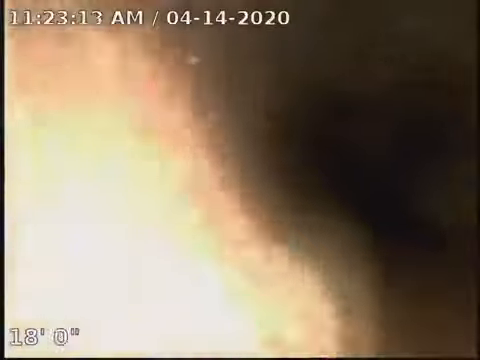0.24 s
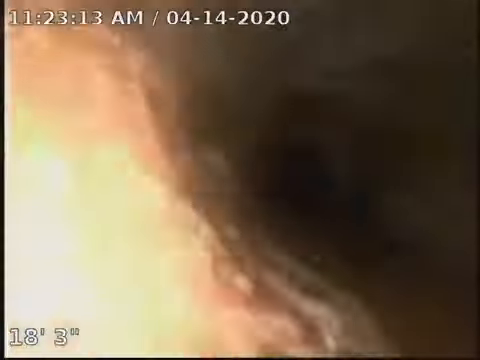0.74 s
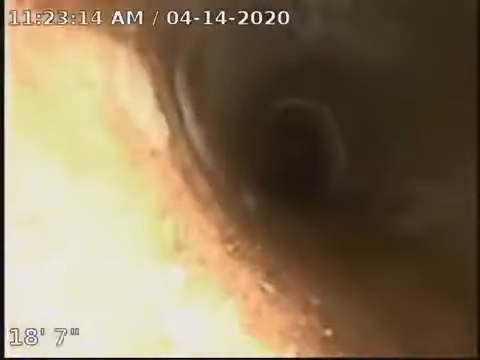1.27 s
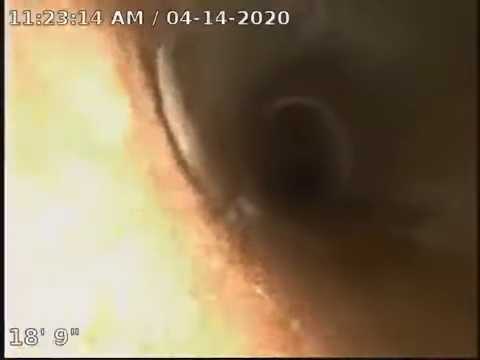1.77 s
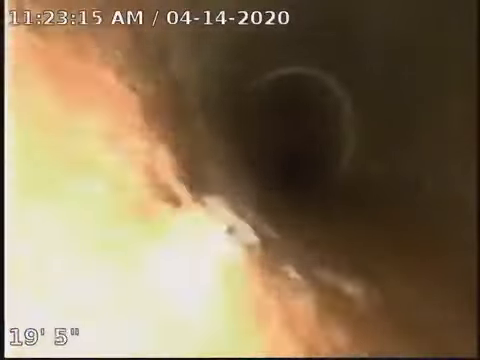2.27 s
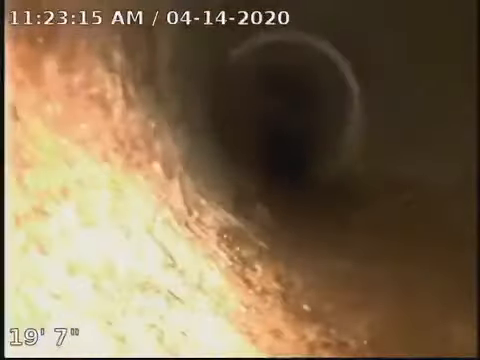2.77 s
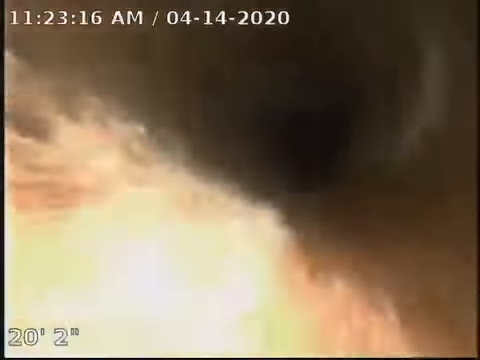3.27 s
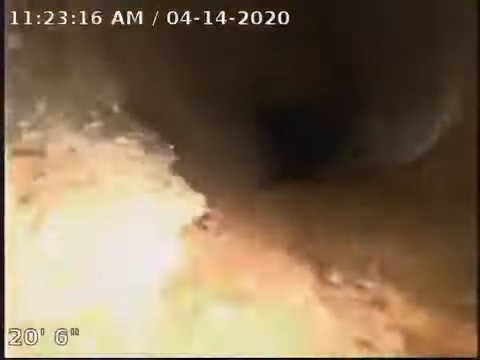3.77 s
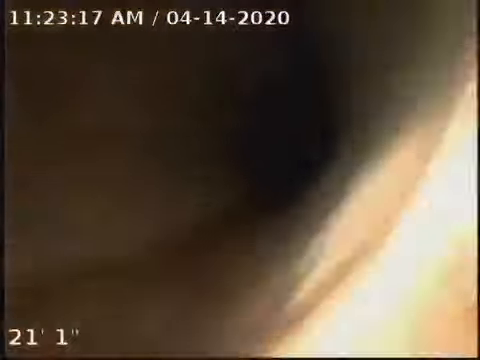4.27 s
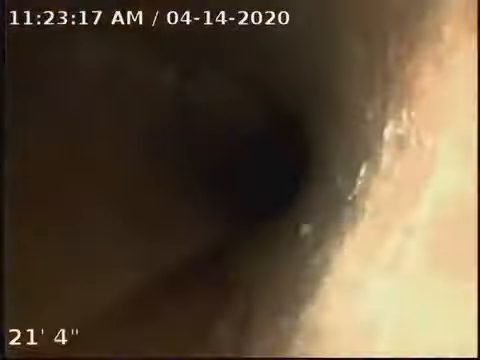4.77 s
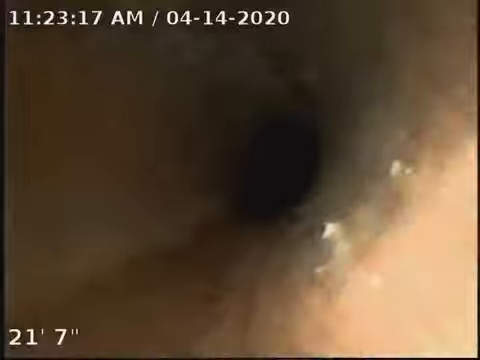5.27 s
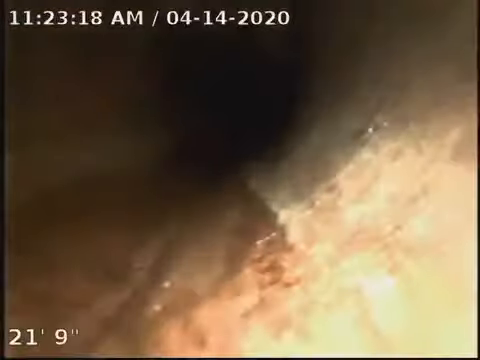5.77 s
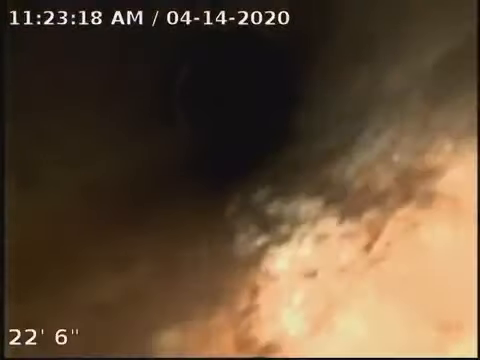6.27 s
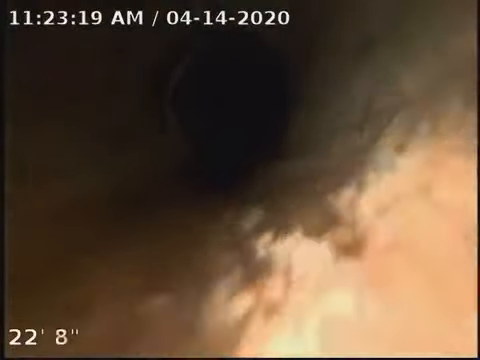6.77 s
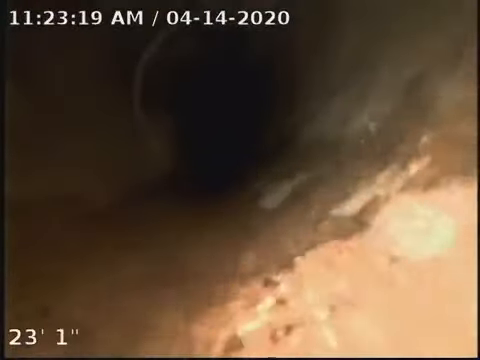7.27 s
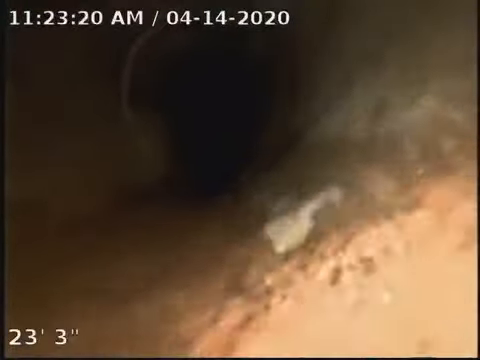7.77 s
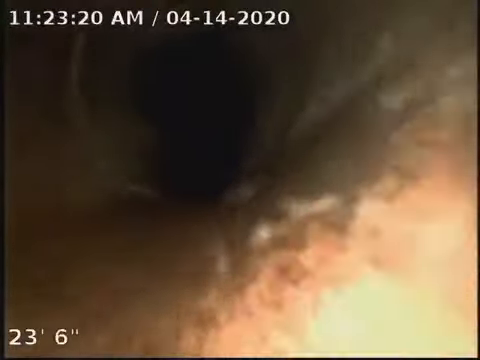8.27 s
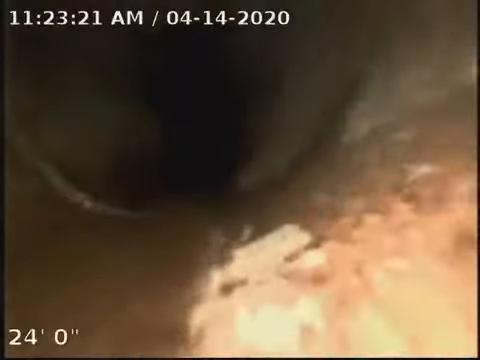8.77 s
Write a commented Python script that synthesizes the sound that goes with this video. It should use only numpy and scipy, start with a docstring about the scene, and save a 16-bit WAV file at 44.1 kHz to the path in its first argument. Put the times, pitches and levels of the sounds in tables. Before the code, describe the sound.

A low, steady motor hum and a lumpy reel rumble run throughout, close and dry, with little extreme treble. Over them a springy rod rubs through its guide in short, breathy, gritty strokes, several a second, pausing briefly between. Within the first second come a knock at 0.06, lighter taps, and a string of tiny squeaks around a thin midrange pitch. At 1.25 a duller thud rings the frame. Scraping continues, with a faint whistle near 2.2 and 3.0. The loudest blows hit at 3.6, a tight cluster of falling, chirping clacks, then a hard crack at 4.03 and a smaller one at 4.28. From 5 to 7 there are grit ticks, brushing coils, faint taps and odd squeaks, with a rasp at 5.7. A clear ringing knock lands at 7.5; dry rasps and deep shudders fill 7.8 to 8.8 as the rubbing goes on.

```python
"""A springy rod pushes an inspection camera down a drain: dry friction rubs in strokes through its guide.
Stick-slip makes the guide squeak, grit ticks on the rod, and blows of the rod set the reel frame ringing.
Friction is noise with tiny slips in it; dispersion along the rod turns slips and slaps into falling chirps.
Behind this the turning reel rumbles and shudders, and a motor holds a steady low hum.
The hardest slaps are rounded, and nothing is heard above about 7 kHz."""
import sys
import numpy as np
from scipy import signal
from scipy.fft import rfft, irfft, next_fast_len
from scipy.io import wavfile
from scipy.ndimage import uniform_filter1d, map_coordinates

SR = 44100
rng = np.random.default_rng(int(sys.argv[2]) if len(sys.argv) > 2 else 0)


def int16_out(signal):
    """Quantize to a 16-bit WAV file."""
    q = np.round(np.clip(np.atleast_2d(signal).T, -1, 1) * 32767)
    wavfile.write(sys.argv[1], SR, q.astype(np.int16))


N = 398223  # length [samples]
TOP_HZ = 6950  # upper limit of the sound

# tones of a motor humming nearby: (frequency [Hz], mean level [dB rms])
HUM_TONES = [(61.9, -40.5), (123.8, -59.5), (154.8, -54), (185.7, -57.5), (317, -65.5)]

# deep shudders of the reel: (time of peak [s], level [dB], length [s])
REEL_SHUDDERS = [(0.16, -35, 0.1), (3.25, -40.5, 0.12), (5.7, -46, .2), (7.52, -41, .12), (7.85, -33, 0.25),
                 (8.1, -42, 0.14), (8.38, -34.5, 0.37), (8.78, -36, 0.18)]
# spectra of the turning reel and of its frame's drone: (frequency [Hz], relative level [dB per Hz])
RUMBLE_SPECTRUM = [(12, -25.5), (22, -7.5), (32, 1), (52, 3.5), (80, -1), (115, -6.5), (145, -13.5),
                   (200, -19), (400, -63)]
DRONE_SPECTRUM = [(110, -15.5), (190, 1.5), (235, 0), (280, -1), (360, -10.5), (440, -5), (520, -17),
                  (700, -22.5), (1200, -52.5)]
RUMBLE_DB, RUMBLE_LUMP_DB = -42, 2  # level and scatter of the rumble
DRONE_REST_DB, DRONE_OVER_RUB_DB = -52.5, 0.5  # the drone at rest, and over the rub that drives it

# grit ticking on the rod: (time [s], level [dB], treble in its spectrum [dB])
GRIT_TICKS = [(0.097, -44.5, 8), (1.572, -42, -9), (2.244, -48, 17), (4.364, -52, -6), (4.832, -43.5, 1),
              (5.023, -40.5, -7), (5.1052, -36.5, -16), (5.379, -49, -24), (5.521, -44, -12),
              (7.671, -45.5, -1), (7.709, -42, -2), (8.7542, -43.5, -2.5)]

# the rod slapping or tapping the frame: (time [s], knock level [dB],
# then over the knock: low thud [dB], mid clack [dB], high crack [dB], ring of the frame [dB])
ROD_SLAPS = [(0.062, -32.5, -1, 0.5, -16, -12), (0.298, -41, -3, 0, -9, -5), (0.752, -49, -6, -5, -26, -14),
             (1.255, -30, 4.5, -5, -18, 2.5), (3.611, -23, -5.5, -6.5, -6, 4),
             (3.616, -19.5, 0.5, -21, -16, -9), (3.621, -14.5, -5, -10, -16.5, -1.5),
             (4.026, -15.5, 0.3, -0.5, -5.5, -3), (4.256, -37, 5, -15, -17, -12),
             (4.279, -24.5, -7.5, -7, -27, -7), (5.438, -47.5, -5, 2, -14, -10),
             (5.569, -45.5, 10, -7, -8, 5), (5.58, -52, 14.5, -7, -13, -4), (6.24, -44.5, 1, -10, -27, 1),
             (6.713, -49, 12.5, -3, -21, -9), (7.506, -37.5, -8, -5, -13, -13),
             (7.52, -25, -1.5, -3, -7, 5.5), (8.316, -55, 7, 1, -23, 4)]
# spectrum of a blow before its bands are levelled: (frequency [Hz], relative level [dB])
SLAP_SPECTRUM = [(50, -15), (105, -4), (145, -10), (250, 3.5), (350, -3.5), (450, 1.5), (650, -3.5),
                 (880, 8), (1300, 4.5), (2000, -4.5), (2700, -10), (3700, -10), (5200, -17), (7000, -26.5)]
# decay of the rattle in a blow: (frequency [Hz], time to fall 60 dB [s])
RATTLE_DECAY = [(100, 0.16), (400, 0.069), (1000, 0.036), (2500, 0.041), (7000, 0.041)]
# modes of the frame: (frequency [Hz], relative level [dB], time to fall 60 dB [s])
FRAME_MODES = [(100, -1, 0.15), (185.5, -9.5, 0.18), (243.8, -4, 0.13), (282, -6.5, 0.11), (348, -7, 0.087),
               (448, -4, 0.095), (616, -11, 0.052), (770, -11, 0.047), (830, -6.5, 0.05),
               (931, -4.5, 0.044), (1008, -10.5, 0.055), (1247, -4, 0.055), (1506, -8.5, 0.05),
               (1934, -10.5, 0.039)]
BUILD_CYCLES = 1.9  # build-up constant of a mode [cycles]
SPOT_SPREAD_DB, DETUNE = 1.5, 0.019  # scatter from blow to blow: level, fraction of the pitch

# short squeaks of the guide: (time of peak [s], level [dB], length [s], pitch [Hz])
GUIDE_SQUEAKS = [(0.282, -45, 0.033, 953), (0.345, -45, 0.022, 945), (0.415, -49, 0.07, 942),
                 (0.624, -44, .02, 975), (0.692, -50.5, 0.055, 960), (0.757, -44, 0.029, 962),
                 (0.757, -47, 0.013, 1320), (0.807, -47, 0.046, 962), (0.853, -45, 0.024, 955),
                 (0.917, -46, 0.04, 975), (0.98, -55, 0.099, 950), (5.994, -43, 0.02, 970),
                 (6.243, -38.5, 0.01, 1040), (6.636, -44, .03, 950)]
SQUEAK_WANDER_HZ, SQUEAK_FLUTTER_DB = 22, 2.5  # scatter of pitch and level

# pushes of the rod through its guide: (time of peak [s], rub level [dB], hiss level [dB], length [s])
ROD_PUSHES = [(0.05, -46, -53.5, 0.19), (0.31, -47.5, -57, 0.25), (0.64, -46, -58.5, 0.21),
              (0.89, -51.5, -58, 0.87), (1.26, -47, -58, 0.13), (1.56, -46, -55.5, 0.23),
              (1.81, -46, -55.5, 0.42), (2.22, -57, -58.5, 0.85), (2.51, -51, -63, 0.063),
              (2.71, -49.5, -61, 0.15), (2.93, -49.5, -54.5, 0.86), (3.18, -47, -51.5, 0.21),
              (3.56, -44, -53, 0.19), (3.86, -51, -54.5, 0.52), (4.24, -53, -59.5, 0.45),
              (4.47, -55, -60.5, 0.27), (4.75, -70, -63.5, 0.11), (5.02, -51, -54, 0.32),
              (5.36, -48.5, -60, 1), (5.72, -50.5, -53.5, 0.43), (6.02, -54, -58.5, 0.072),
              (6.26, -60, -61.5, 0.16), (6.44, -52.5, -59, 0.14), (6.64, -46.5, -52.5, 0.21),
              (6.89, -50.5, -56, 0.41), (7.28, -60, -55, 0.074), (7.47, -53, -61, 0.23),
              (7.73, -53, -56, 0.54), (7.96, -52, -57.5, 0.28), (8.28, -61, -61, 0.85),
              (8.55, -50, -58.5, 0.08), (8.71, -56, -60.5, 0.16)]
# coils brushing the frame: (time of peak [s], brush level [dB], drone level [dB], length [s])
COIL_BRUSHES = [(0.05, -43, -42.5, 0.052), (0.275, -44, -41.5, 0.055), (0.309, -42, -49, 0.064),
                (1.262, -39, -38, 0.091), (1.31, -57, -44, .03), (1.926, -58, -42, 0.12),
                (2.2, -64, -49, 0.61), (2.52, -67.5, -40.5, 0.07), (3.26, -46.5, -44.5, 0.068),
                (3.6, -36.5, -39, 0.04), (3.93, -49, -43, 0.038), (4.268, -37, -41, 0.038),
                (5.01, -45.5, -50, 0.061), (5.08, -65, -44, 0.67), (5.42, -50, -44, 0.045),
                (5.572, -37.5, -44, 0.02), (5.705, -41.5, -37, 0.027), (5.832, -43.5, -39, 0.036),
                (6.02, -43, -43, 0.071), (6.236, -44.5, -37, 0.062), (6.68, -45, -39.5, 0.1),
                (7.075, -41.5, -42.5, 0.049), (7.306, -44, -43, 0.066), (7.513, -35, -32, 0.015),
                (8.315, -43.5, -38.5, 0.075), (8.58, -59, -44, 0.19)]
# a drier rasp on a few pushes: (time of peak [s], level [dB], length [s])
RASP_SWELLS = [(5.745, -48, 0.096), (7.78, -55, 0.18), (7.93, -48, 0.16)]
# the guide's thin ring catching on its own: (time of peak [s], level [dB], length [s])
RING_WHINES = [(0.06, -63, .1), (2.7, -56, 0.07), (2.89, -50, 0.05), (3.3, -61.5, 0.51),
               (3.579, -45.5, 0.034), (3.86, -53, .12), (4.259, -50, 0.029), (8.05, -57, 0.082),
               (8.303, -51, 0.016), (8.333, -51.5, .018)]
# a faint high whistle in the hiss: (time of peak [s], level [dB], length [s])
HISS_WHISTLES = [(0.23, -61.5, 0.17), (2.18, -60, 0.44), (3.02, -56.5, 0.24), (5.02, -63, 0.14)]
# the rod stalling: (time of stillest point [s], depth, negative lifts [dB], length [s])
ROD_STALLS = [(0.5, 1.5, 0.18), (1.116, 3.5, 0.062), (1.424, 5.5, 0.12), (1.706, 5, 0.076),
              (2.61, 5.5, 0.078), (2.85, 3, 0.2), (3.78, -0.5, 0.12), (4.105, 2, 0.048), (4.628, 3, 0.071),
              (4.812, 3, 0.069), (6.13, 4, 0.077), (6.325, 2, .04), (7.11, 5.5, 0.039), (7.42, 2.5, 0.047),
              (8.467, 1, 0.056)]
# spectra of the friction: (frequency [Hz], relative level [dB per Hz])
RUB_SPECTRUM = [(300, -24.5), (520, 0), (700, -1.5), (1100, 1), (1600, -3), (2200, -4.5), (2600, -7.5),
                (3300, -11), (5000, -40)]
HISS_SPECTRUM = [(1500, -17), (2500, 2), (3300, 5.5), (4200, 4), (4900, 1.5), (5600, 5), (6700, 1),
                 (7200, -29)]
BRUSH_SPECTRUM = [(300, -4.5), (500, 4.5), (720, -3), (1000, -1), (1500, -7.5), (2200, -13.5),
                  (3000, -17.5), (4200, -20.5), (6000, -28.5)]
RASP_SPECTRUM = [(1000, -26.5), (1700, 3.5), (2400, 5), (3350, 3.5), (3900, -8.5), (5000, -31.5)]
# resonances of the guide: (frequency [Hz], width [Hz], level over the direct sound [dB])
GUIDE_RESONANCES = [(955, 54, -5.5), (1210, 170, -21), (4364, 150, 0), (6610, 130, -4.5)]
RISE_SHARE, SWELL_SHAPE = 0.48, 1.07  # part of a swell spent rising; its top (1 pointed, 2 bell-shaped)
CREEP_RUB_DB, CREEP_HISS_DB = -58.5, -65.5  # the rod creeping on between pushes
RING_OVER_HISS_DB, RING_OVER_BRUSH_DB = -6.5, -19  # the thin ring follows the friction
SLIPS_PER_S, SLIP_SPREAD_DB = 370, 1.5  # tiny slips: mean rate, scatter of size
BRUSH_SLIP_DB, RUB_SLIP_DB = 1.5, -6  # slips over the smooth noise of a brush and of a rub
# time a 1 kHz bending wave needs to run down the rod, from a slip and from a slap [s]
SLIP_TRAVEL_S, SLAP_TRAVEL_S = 0.004276, 0.002978


def amp(db):
    """Amplitude ratio: 20 dB is a factor of ten."""
    return 10 ** (np.asarray(db) / 20)


def unit(x):
    """Normalization: x at rms 1."""
    return x / np.sqrt(np.mean(x ** 2) + 1e-20)


def along(points, hz):
    """Interpolation on a log frequency axis: (frequency [Hz], value) points read at hz."""
    f, v = np.transpose(points)
    return np.interp(np.log(hz + 1), np.log(f + 1), v)


def curves(rows):
    """Linear interpolation in time: one value per sample for each column after the time."""
    s, *cols = np.transpose(rows)
    return [np.interp(np.arange(N) / SR, s, c) for c in cols]


def wobble(rate):
    """Band-limited randomness: a smooth curve through rate random knots a second."""
    knots = rng.standard_normal(int(N * rate / SR) + 4)
    return map_coordinates(knots, [np.arange(N) * rate / SR])


def filtered(x, response):
    """Linear filtering: the spectrum of x times a response of frequency."""
    m = next_fast_len(len(x) + SR // 4)
    return irfft(rfft(x, m) * response(np.fft.rfftfreq(m, 1 / SR)), m)[:len(x)]


def resonance(f, hz, width):
    """Damped resonance: response of one mode, 1 at its centre."""
    return 1j * f * width / (hz * hz - f * f + 1j * f * width)


def noise(spectrum):
    """Spectral shaping: coloured noise of rms 1."""
    return unit(filtered(rng.standard_normal(N), lambda f: amp(along(spectrum, f))))


def narrow(hz, width):
    """Selective resonance: noise through two equal modes in series, at rms 1."""
    return unit(filtered(rng.standard_normal(N), lambda f: resonance(f, hz, width) ** 2))


def add(track, s, sound):
    """Superposition: mix a sound into the track at time s."""
    start = max(round(s * SR), 0)
    track[start:start + len(sound)] += sound[:N - start]


def swells(rows):
    """Addition of powers: each event rises, peaks and dies away; one gain curve per level column."""
    peak, *levels, length = np.transpose(rows)
    s = np.arange(0, N / SR, .001)
    age = (s - peak[:, None]) / length[:, None]
    from_peak = np.maximum(-age / RISE_SHARE, age / (1 - RISE_SHARE))
    power = np.exp(-2 * from_peak ** SWELL_SHAPE)
    gains = np.sqrt(amp(levels) ** 2 @ power)
    return curves(np.column_stack([s, *gains]))


def bending(x, travel):
    """Dispersion: bending waves run faster at higher frequency, so the treble arrives first."""
    # delays count from the arrival of TOP_HZ; travel is the whole journey of 1 kHz
    phase = lambda f: 2 * np.sqrt(1000 * f) - f * np.sqrt(1000 / TOP_HZ)
    return filtered(x, lambda f: np.exp(-2j * np.pi * travel * phase(f)))


def band_peak(x, response):
    """Short-time power: one band of x, scaled so that its loudest 5 ms have rms 1."""
    band = filtered(x, response)
    return band / np.sqrt(uniform_filter1d(band ** 2, size=220).max())


def hum():
    """Modulated steady tones: each wavers a little in level and phase."""
    t = np.arange(N) / SR
    out = np.zeros(N)
    for hz, db in HUM_TONES:
        level = np.sqrt(2) * amp(db + 0.68 * wobble(4.8))  # sqrt(2): peak of a sine over its rms
        phase = 0.24 * wobble(1.5) + rng.uniform(0, 2 * np.pi)
        out += level * np.sin(2 * np.pi * hz * t + phase)
    return out


def reel(rubbing, knocking):
    """Forced vibration: pushes and brushes drive the frame's drone over a lumpy rumble and shudders."""
    rumble = amp(RUMBLE_DB + RUMBLE_LUMP_DB * wobble(12.0)) * noise(RUMBLE_SPECTRUM)
    driven = np.hypot(amp(DRONE_REST_DB), amp(DRONE_OVER_RUB_DB) * rubbing)
    shake = np.hypot(driven * amp(1.2 * wobble(25)), knocking)
    shudder = swells(REEL_SHUDDERS)[0] * narrow(33.22, 3.1)
    return rumble + shake * noise(DRONE_SPECTRUM) + shudder


def ticks():
    """Impulsive contact: grit gives tiny dry bursts, dull or bright."""
    out, t = np.zeros(N), np.arange(SR // 30) / SR
    for s, db, bright_db in GRIT_TICKS:
        burst = rng.standard_normal(len(t)) * amp(-60 * t / 0.024)  # falls 60 dB in 24 ms
        colour = [(500, -27.0), (1300, 3), (2800, -2.5), (5000, bright_db)]
        add(out, s, amp(db) * band_peak(burst, lambda f: amp(along(colour, f)) * (f < TOP_HZ)))
    return out


def frame_ring(t):
    """Modal superposition: modes build up and die away, scattered as each blow lands on another spot."""
    out = np.zeros(len(t))
    for hz, db, t60 in FRAME_MODES:
        louder, sharper, phase = rng.standard_normal(3)
        decay = amp(db + SPOT_SPREAD_DB * louder - 60 * t / t60)
        build_up = 1 - np.exp(-t * hz / BUILD_CYCLES)
        pitch = hz * (1 + DETUNE * sharper)
        out += decay * build_up * np.sin(2 * np.pi * pitch * t + np.pi * phase)
    return out


def slap_blow(t, lead):
    """Impact excitation: an impulse and a rattle that decays by frequency, after lead samples."""
    hz, age, z = signal.stft(rng.standard_normal(len(t)), SR, nperseg=128)
    decay = amp(-60 * age / along(RATTLE_DECAY, hz)[:, None])
    rattle = signal.istft(z * decay, SR, nperseg=128)[1][:len(t)]
    return np.pad((t == 0) + 0.1 * rattle, (lead, 0))


def slaps():
    """Impact and dispersion: a blow becomes a falling chirp with a rattle, and rings the frame."""
    out, t = np.zeros(N), np.arange(SR // 4) / SR
    lead = SR // 100  # 10 ms of room ahead of the blow
    below = lambda f, edge_hz: 1 / (1 + (f / edge_hz) ** 8)
    thud_hz, knock_hz, clack_hz = 530, 1400, 2600  # upper band edges
    for s, db, thud_db, clack_db, crack_db, ring_db in ROD_SLAPS:
        coloured = filtered(slap_blow(t, lead), lambda f: amp(along(SLAP_SPECTRUM, f)))
        sound = bending(coloured, SLAP_TRAVEL_S)
        thud = amp(thud_db) * band_peak(sound, lambda f: below(f, thud_hz))
        knock = band_peak(sound, lambda f: below(f, knock_hz) - below(f, thud_hz))
        clack = amp(clack_db) * band_peak(sound, lambda f: below(f, clack_hz) - below(f, knock_hz))
        crack = amp(crack_db) * band_peak(sound, lambda f: 1 - below(f, clack_hz))
        add(out, s - lead / SR, amp(db) * (thud + knock + clack + crack))
        add(out, s + SLAP_TRAVEL_S, amp(db + ring_db) * frame_ring(t))
    return out


def squeaks():
    """Stick-slip oscillation: the guide sings short notes that stray in pitch and flutter in level."""
    stray_hz = SQUEAK_WANDER_HZ * (wobble(160) + 0.299 * wobble(20))
    flutter = np.sqrt(2) * unit(amp(SQUEAK_FLUTTER_DB * wobble(190)))
    out = np.zeros(N)
    for s, db, length, hz in GUIDE_SQUEAKS:
        note = np.sin(2 * np.pi * np.cumsum(hz + stray_hz) / SR)
        out += swells([(s, db, length)])[0] * note
    return flutter * out


def slips(spectrum):
    """Random impulses and dispersion: tiny slips, each drawn out into a chirp by the rod; rms 1."""
    happens = rng.random(N) < SLIPS_PER_S / SR
    size = amp(SLIP_SPREAD_DB * np.clip(rng.standard_normal(N), -2, 2))
    kicks = happens * rng.choice([-1, 1], N) * size
    return unit(bending(filtered(kicks, lambda f: amp(along(spectrum, f))), SLIP_TRAVEL_S))


def friction(spectrum, slip_db):
    """Dry friction: smooth sliding noise with tiny slips in it; rms 1."""
    return unit(noise(spectrum) + amp(slip_db) * slips(spectrum))


def sliding():
    """Friction needs motion: the gain of its sound drops as the rod stalls."""
    t = np.arange(N) / SR
    return amp(-sum(depth * np.exp(-(2 * (t - s) / length) ** 2) for s, depth, length in ROD_STALLS))


def guide(f):
    """Resonant coloration: magnitude response of the direct sound plus the guide's resonances."""
    return np.abs(1 + sum(amp(db) * resonance(f, hz, width) for hz, width, db in GUIDE_RESONANCES))


def rod(rubbing, hissing, brushing):
    """Sliding friction into resonators: uneven rubbing coloured by the guide, a thin ring and a whistle."""
    grip = amp(1.3 * wobble(45) + 0.81 * wobble(400))  # the rod's surface catches and lets go
    rub = np.hypot(rubbing, amp(CREEP_RUB_DB)) * friction(RUB_SPECTRUM, RUB_SLIP_DB)
    hiss = np.hypot(hissing, amp(CREEP_HISS_DB)) * noise(HISS_SPECTRUM)
    rasp = swells(RASP_SWELLS)[0] * noise(RASP_SPECTRUM)
    brush = brushing * friction(BRUSH_SPECTRUM, BRUSH_SLIP_DB)
    coloured = filtered(grip * (rub + hiss + rasp) + brush, guide)
    # the thin ring flutters, swells with each push and brush, and now and then whines
    driven = amp(RING_OVER_HISS_DB) * hissing + amp(RING_OVER_BRUSH_DB) * brushing
    ring_level = np.hypot(driven, swells(RING_WHINES)[0])
    ring = ring_level * amp(2.0 * wobble(55)) * narrow(2869, 120)
    whistle = swells(HISS_WHISTLES)[0] * narrow(6660, 220)
    return sliding() * (coloured + ring + whistle)


def scene():
    """Superposition at one microphone: the same pushes and brushes drive both rod and reel."""
    rubbing, hissing = swells(ROD_PUSHES)
    brushing, knocking = swells(COIL_BRUSHES)
    background = hum() + reel(rubbing, knocking)
    contacts = ticks() + slaps() + squeaks()
    return (background + contacts + rod(rubbing, hissing, brushing))[None]


def record(dry):
    """Saturation and low-pass filtering: the hardest slaps are rounded, then all above TOP_HZ falls away."""
    rounded = dry / (1 + np.abs(dry / .9) ** 6) ** (1 / 6)
    return np.array([filtered(x, lambda f: 1 / np.hypot(1, (f / TOP_HZ) ** 60)) for x in rounded])


dry = scene()
out = record(dry)
int16_out(out)
```